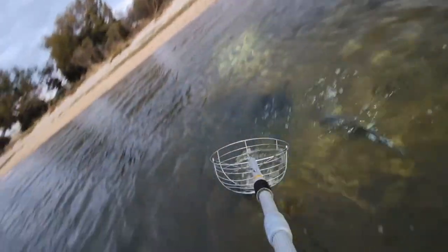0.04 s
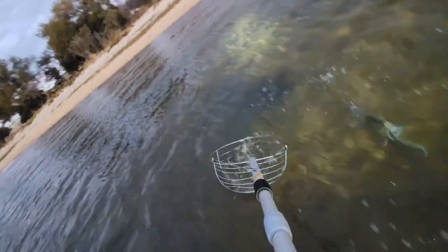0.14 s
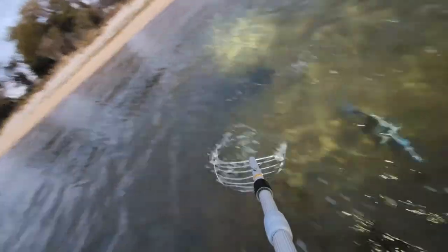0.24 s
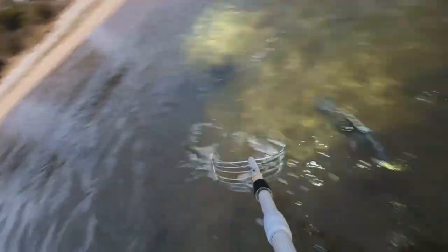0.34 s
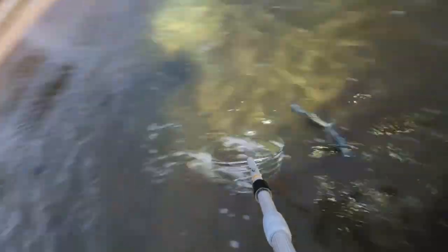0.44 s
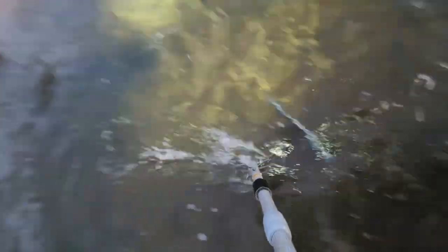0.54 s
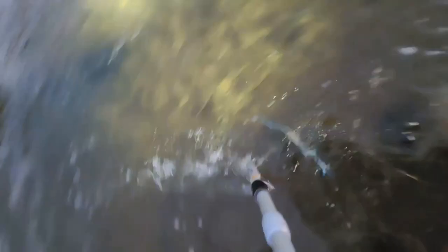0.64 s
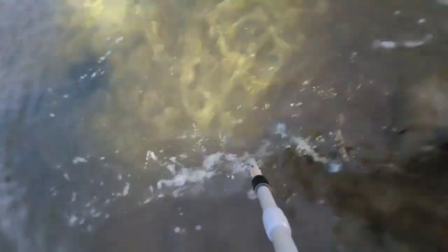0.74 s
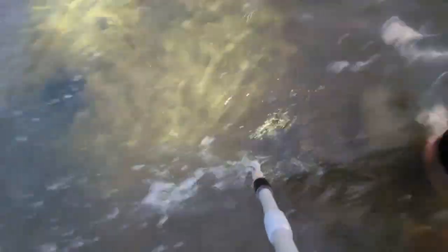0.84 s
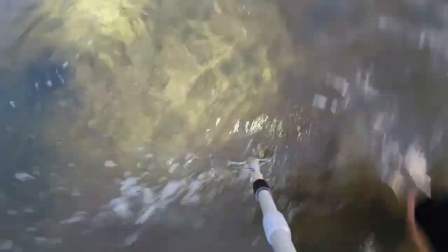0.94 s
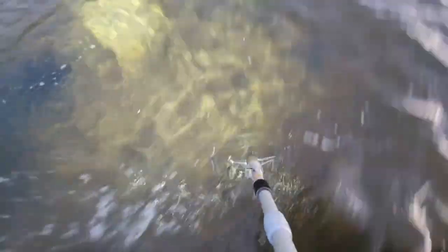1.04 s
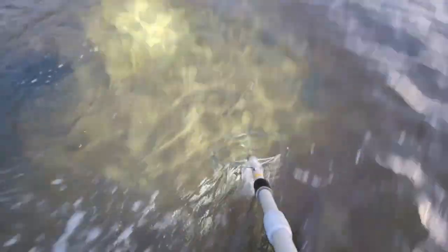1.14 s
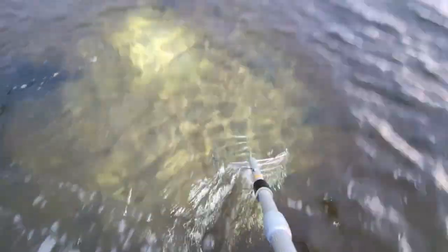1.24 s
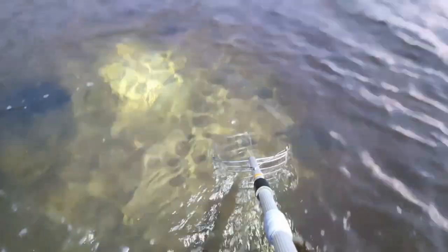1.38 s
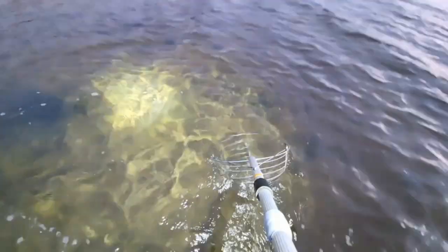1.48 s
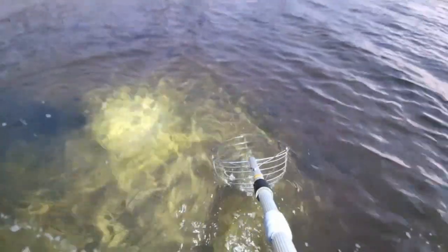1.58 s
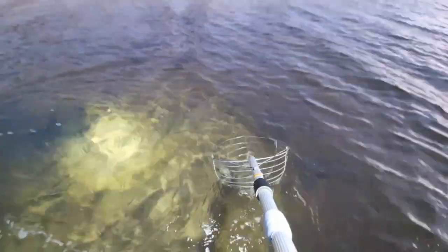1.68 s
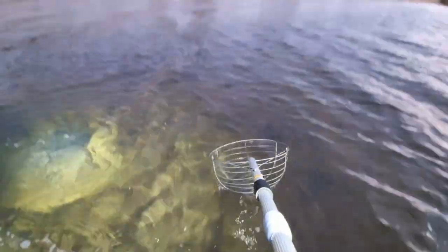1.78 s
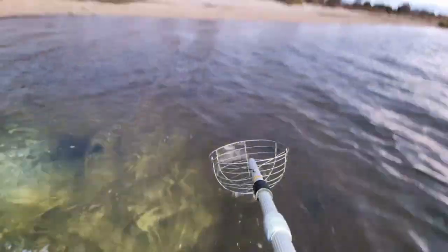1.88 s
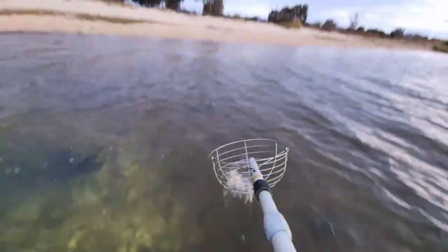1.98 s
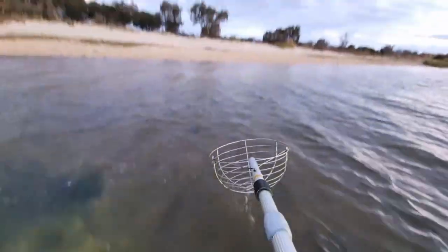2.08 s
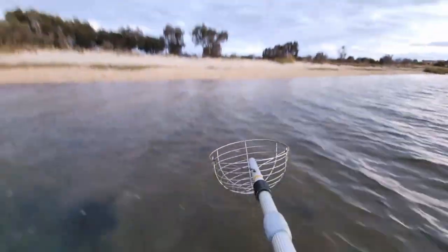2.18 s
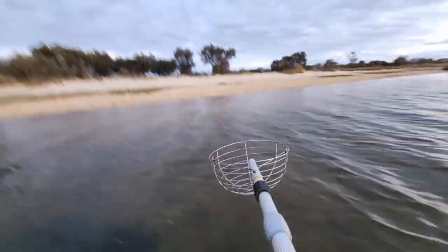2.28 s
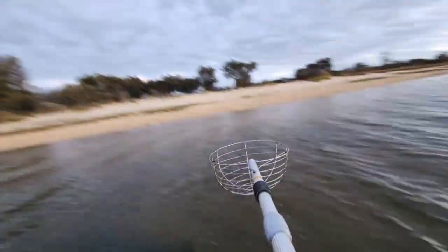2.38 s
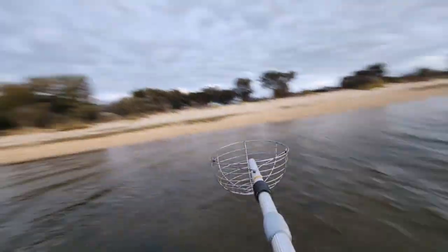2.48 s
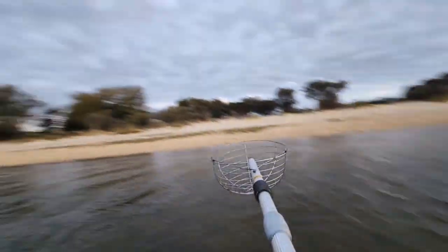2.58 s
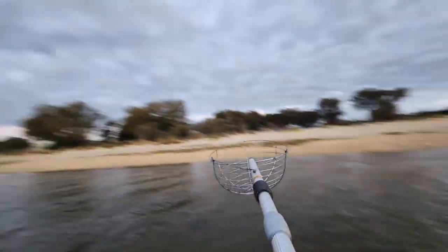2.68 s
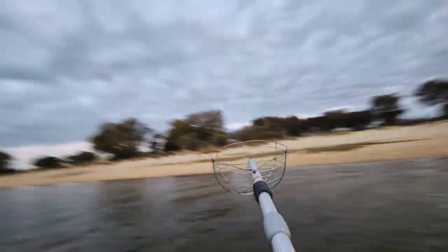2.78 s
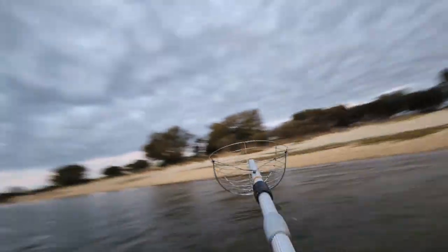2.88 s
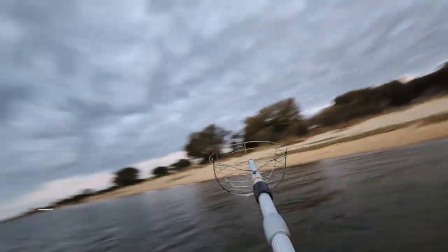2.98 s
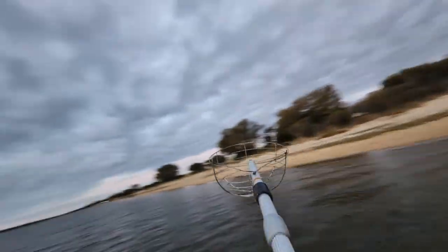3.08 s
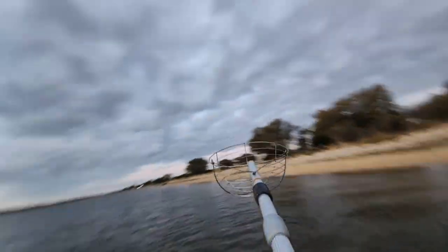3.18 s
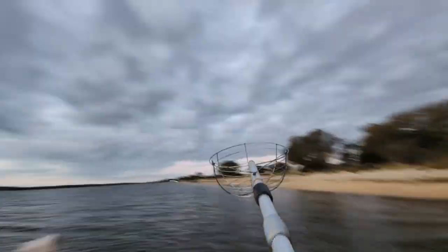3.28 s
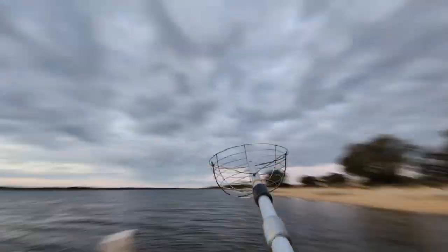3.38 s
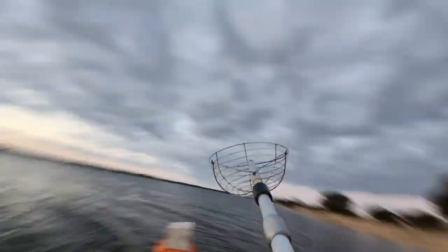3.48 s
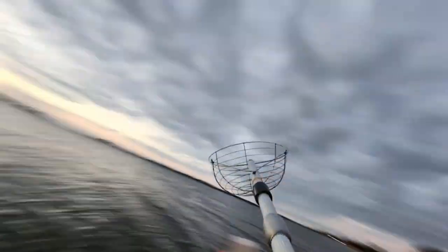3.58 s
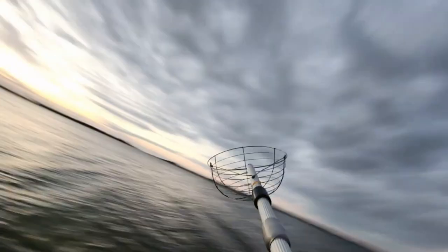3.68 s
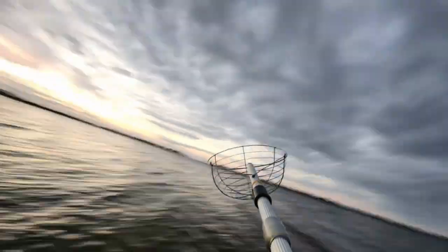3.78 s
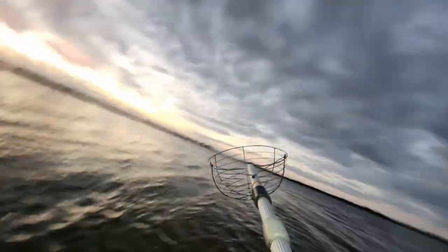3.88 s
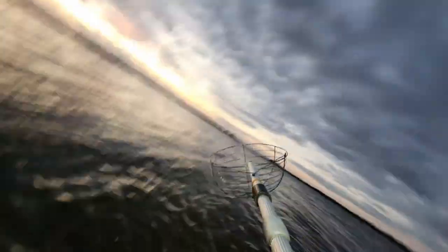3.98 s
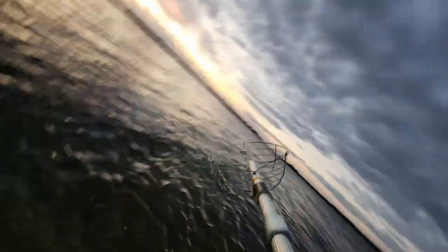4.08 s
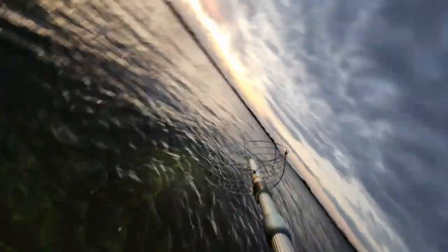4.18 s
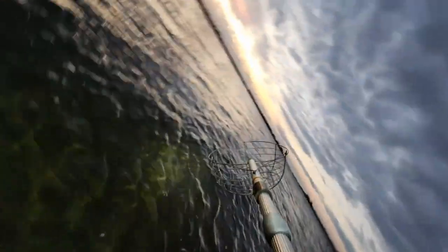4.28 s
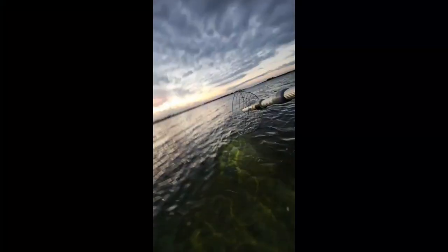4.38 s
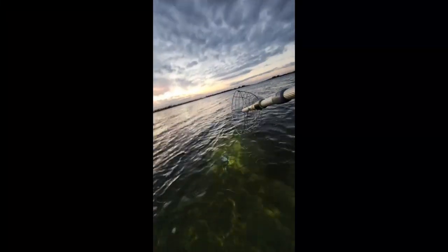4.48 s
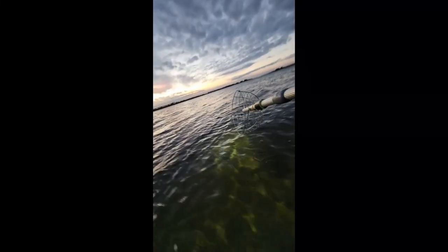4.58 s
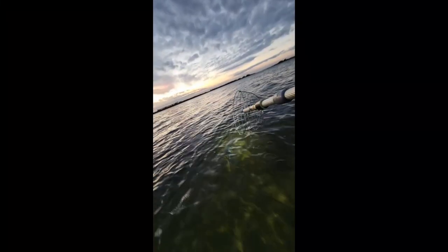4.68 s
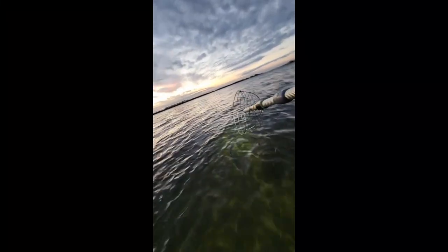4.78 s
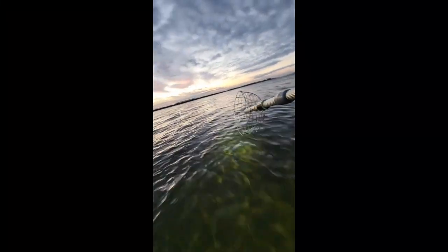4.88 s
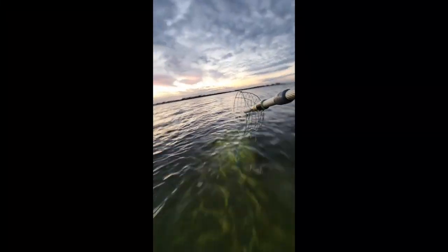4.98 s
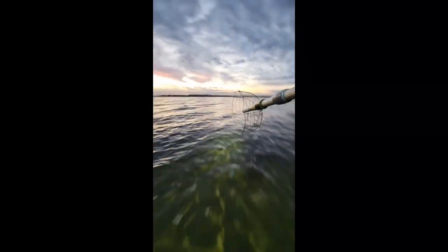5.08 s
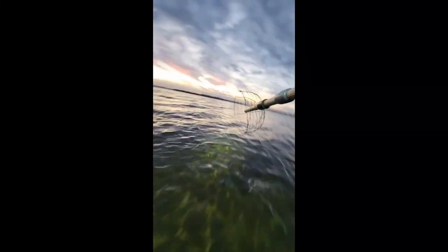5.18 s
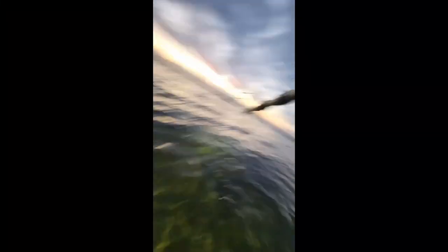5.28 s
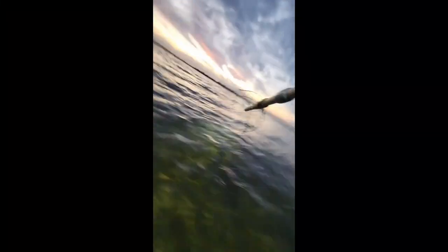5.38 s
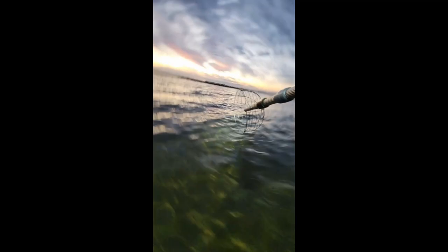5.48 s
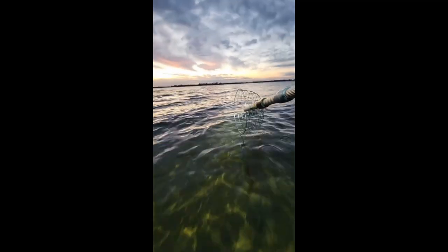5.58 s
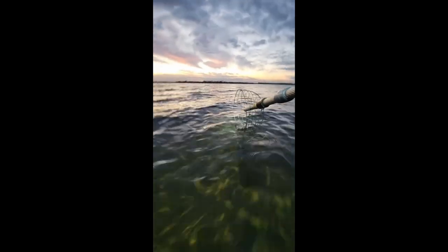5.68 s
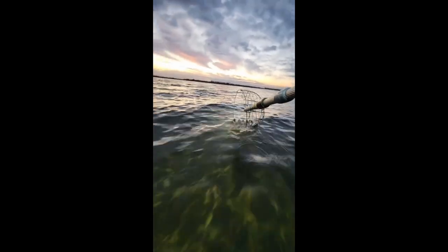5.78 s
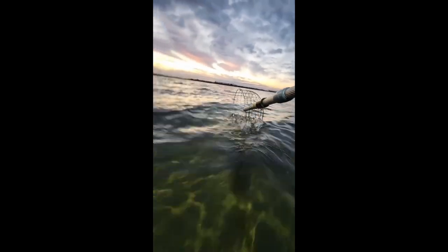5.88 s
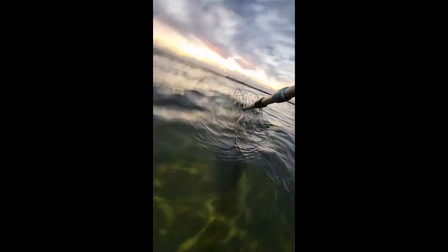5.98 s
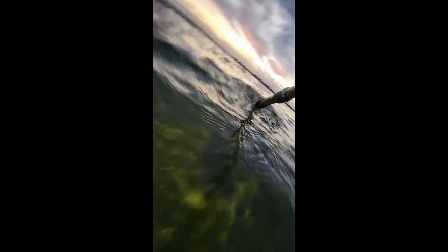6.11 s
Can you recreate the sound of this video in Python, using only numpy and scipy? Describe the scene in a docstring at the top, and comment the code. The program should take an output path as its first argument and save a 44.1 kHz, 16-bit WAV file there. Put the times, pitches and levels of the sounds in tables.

```python
"""Scoop net in windy shallows

A wire scoop net is jabbed about on a tidal flat: bubble clouds and foam noise slosh, splash and spray.
Damped sines plop and plink, gliding tones gulp, and one jerky scrape on sand rings the net's wires.
After a lull of drips the water churns steadily, a little to the left by its lead at the left port.
Wind, as lumpy low noise that differs between the two microphone ports, buffets throughout."""
import sys
import numpy as np
from scipy import signal
from scipy.fft import rfft, irfft, next_fast_len
from scipy.io import wavfile
from scipy.ndimage import uniform_filter1d, map_coordinates

SR = 44100
rng = np.random.default_rng(int(sys.argv[2]) if len(sys.argv) > 2 else 0)


def generate_wav(signal):
    """Clip the signal to [-1, 1] and save it as 16-bit WAV at the path in sys.argv[1]."""
    frames = np.transpose(np.atleast_2d(signal))
    scaled = np.clip(frames, -1, 1) * 32767
    pcm = np.round(scaled).astype(np.int16)
    wavfile.write(sys.argv[1], SR, pcm)


N = 270970


def amp(db):
    """Decibels to amplitude ratio."""
    return 10 ** (np.asarray(db) / 20)


def unit(x):
    """Normalisation to an rms of 1."""
    return x / np.sqrt(np.mean(x ** 2) + 1e-20)


def clock():
    """The time of every sample, in s."""
    return np.arange(N) / SR


def curves(rows):
    """Linear interpolation: one value per sample for each column after the time."""
    s, *columns = np.transpose(rows)
    return [np.interp(clock(), s, column) for column in columns]


def wobble(rate):
    """Band-limited fluctuation: a smooth random curve with rate knots a second."""
    knots = rng.standard_normal(int(N * rate / SR) + 4)
    return map_coordinates(knots, [clock() * rate])


def filtered(x, response):
    """Linear filtering: the spectrum of x times a response of frequency."""
    size = next_fast_len(N + SR // 2)
    spectrum = rfft(x, size) * response(np.fft.rfftfreq(size, 1 / SR))
    return irfft(spectrum, size)[..., :N]


def coloured(x, points):
    """Spectral shaping: x weighted by (Hz, dB) points on a log axis, at rms 1."""
    f, db = np.transpose(points)

    def response(hz):
        top_skirt = 1 / (1 + (hz / (2 * f[-1])) ** 2)
        low_skirt = hz ** 2 / (hz ** 2 + (f[0] / 2) ** 2)
        return top_skirt * low_skirt * amp(np.interp(np.log(hz + 1), np.log(f), db))

    return unit(filtered(x, response))


def noise(alike):
    """Partial coherence: white noise at both ports, of which a share of the power is common."""
    share = np.clip(alike, 0, 1)
    common = np.sqrt(share) * rng.standard_normal(N)
    return common + np.sqrt(1 - share) * rng.standard_normal((2, N))


def patchy(x, depth_db):
    """Spectro-temporal modulation: clumps of like pitch swell and fade in patches."""
    z = signal.stft(x, nperseg=512)[2]
    field = rng.standard_normal(z.shape[1:])
    field = uniform_filter1d(uniform_filter1d(field, size=7, axis=0), size=6, axis=1)
    return signal.istft(z * amp(depth_db * unit(field)), nperseg=512)[1][:, :N]


RISE_DB = 52.5  # how far a stroke swells over its rise time


def stroke(s, rise, hold, fall_db_per_s):
    """Exponential envelope: the gain of one movement swells up to time s, holds, then dies away."""
    t = clock() - s
    swell_db = RISE_DB * np.minimum(t, 0) / rise
    return amp(swell_db - fall_db_per_s * np.maximum(t - hold, 0))


# Wind strength: start_s [s], level_db [dB, before the lean to the left port]
WIND_BUFFETS = [(0, -52.5), (.3, -38.5), (.63, -33), (1.4, -34), (2.05, -37.5), (2.35, -50.5),
                (3.65, -47.5), (3.85, -35.5), (4.25, -36), (4.65, -55), (4.97, -36), (5.6, -35.5),
                (6.14, -41.5)]
# Eddies that hit the ports hard: middle_s [s], level_db [dB, before the lean], half_s [s, fall to 1/e]
WIND_THUMPS = [(0.612, -22, 0.019), (1.023, -32.5, 0.018), (4.068, -26, 0.015)]
# Colour of the buffeting: frequency_hz [Hz], density_db [relative dB per Hz]
RUMBLE_COLOUR = [(16, -36), (43, -2.5), (120, -6), (220, -12.5), (450, -22), (1200, -54)]
# Colour of the higher roar of gusts: frequency_hz [Hz], density_db [relative dB per Hz]
ROAR_COLOUR = [(150, -5), (280, -1.5), (400, -6), (600, -30.5), (1200, -28)]
ROAR_DB, ROAR_GROWS = 1, 3.57  # dB over the strongest buffet, and dB per dB of buffet


def wind():
    """Turbulent pressure: nearly incoherent eddies buffet and thump, harder on the left; gusts roar."""
    buffet_db, = curves(WIND_BUFFETS)
    lumps = amp(1.15 * wobble(13) + 8.2 * np.tanh([wobble(40), wobble(40)]))
    lean = amp(1.2 * np.array([[1], [-1]]))
    peak_db = buffet_db.max()
    roar_db = peak_db + ROAR_DB + ROAR_GROWS * (buffet_db - peak_db)
    roar = amp(roar_db) * unit(lumps * coloured(noise(0), ROAR_COLOUR))
    hits = sum(amp(db) * np.exp(-((clock() - s) / half) ** 2) for s, db, half in WIND_THUMPS)
    thumps = hits * coloured(noise(0.16), RUMBLE_COLOUR)
    buffet = amp(buffet_db) * unit(lumps * coloured(noise(0.075), RUMBLE_COLOUR))
    return (buffet + thumps) * lean + roar


# Flung drops: peak_s [s], level_db [dB]
FLUNG_DROPS = [(0.0952, -33), (.6025, -38), (1.2493, -37), (1.3134, -40.5), (1.991, -36.5), (2.534, -39),
               (2.773, -40), (3.834, -38.5), (3.942, -39), (4.385, -33.5), (4.904, -29), (5.1234, -30),
               (5.657, -31.5), (6.0816, -29.5)]
# Colour of spray and spatter: frequency_hz [Hz], density_db [relative dB per Hz]
SPRAY_COLOUR = [(2500, 2.5), (6000, -2.5), (9800, -6), (11700, -2.5), (15500, -5.5)]


def drops():
    """Impact noise: flung drops land with a bright, spiky spatter that peaks quickly and fades."""
    strength = np.zeros(N)
    for s, db in FLUNG_DROPS:
        before, after = (s - clock()) / 0.0044, (clock() - s) / 0.014
        strength += amp(db) * np.exp(-np.maximum(before, after))
    spatter = noise(0) * amp(6.5 * wobble(1200))
    return strength * coloured(spatter, SPRAY_COLOUR)


# The basket catches in the sand: start_s [s, full pressure], level_db [relative dB], hold_s [s]
SAND_CATCHES = [(0.84, -34, 0.098), (0.944, -21, 0.013), (.983, -17, 0.014), (1.021, -24, 0.017)]
CATCH_RISE_S, CATCH_FALL_DB_PER_S = .003, 480
# Modes of the basket's wires: pitch_hz [Hz], level_db [relative dB]
WIRE_MODES = [(1514, -4), (2859, -4), (2974, -4), (3237, -3), (3504, -4), (3658, -4), (3772, -4), (3931, 0),
              (4389, -6), (5535, -5)]
WIRE_T60 = .08  # s, decay by 60 dB
# Colour of the bright grating: frequency_hz [Hz], density_db [relative dB per Hz]
SAND_COLOUR = [(900, -11), (2000, -3), (3600, 2), (6000, 0), (6800, -8.5), (10000, -14.5)]
# Colour of the dull grinding: frequency_hz [Hz], density_db [relative dB per Hz]
GRIND_COLOUR = [(350, 10.5), (900, -1.5), (2200, -2.5), (3500, -19)]


def scrape():
    """Friction-driven resonance: sand grates in jerks and excites the wires, soon damped by the water."""
    catches = [amp(db) * stroke(s, CATCH_RISE_S, hold, CATCH_FALL_DB_PER_S) for s, db, hold in SAND_CATCHES]
    grit = np.max(catches, axis=0) * amp(2.6 * wobble(300))
    t = np.arange(SR // 3) / SR
    modes = sum(amp(db) * np.sin(2 * np.pi * hz * t + rng.normal(0, 0.52, (2, 1))) for hz, db in WIRE_MODES)
    wires = amp(-60 * t / WIRE_T60) * modes
    ringing = signal.fftconvolve(grit * noise(0.9), wires / np.linalg.norm(wires[0]), axes=1)[:, :N]
    bending = np.arange(N) + 4 * wobble(40)  # a wavering read position bends the pitch
    ringing = np.array([map_coordinates(port, [bending]) for port in ringing])
    # the root keeps the grinding present under light pressure
    grinding = np.sqrt(grit) * coloured(noise(0.21), GRIND_COLOUR)
    grating = grit * coloured(patchy(noise(0.23), depth_db=4), SAND_COLOUR)
    return amp(-18.0) * grinding + amp(-8.5) * grating + amp(-7.5) * ringing


BUBBLE_RISE = 0.026  # share by which a bubble's pitch climbs over its life


def ring(t, hz, life, rise):
    """Bubble resonance: a damped sine builds within a cycle and climbs in pitch as it nears the surface."""
    t = np.maximum(t, 0)
    tone = np.sin(2 * np.pi * hz * t * (1 + rise * t / life / 2))
    return tone * np.exp(-t / life) * (1 - np.exp(-2 * hz * t))


def single_bubbles(rows, cycles):
    """Transient and resonance: each bubble starts with a small wet snap and rings out over its cycles."""
    out = np.zeros((2, N))
    t = np.arange(SR // 10) / SR
    for s, hz, db in rows:
        snap = amp(-20) * np.exp(-t / 0.00079) * rng.standard_normal((2, len(t)))
        soft_snap = signal.lfilter([.5], [1, -.5], snap)
        tone = ring(t, hz, cycles / hz, BUBBLE_RISE)
        out[:, round(s * SR):][:, :len(t)] += amp(db) * (tone / np.abs(tone).max() + soft_snap)
    return out


# Open cavities that slap shut: start_s [s], pitch_hz [Hz], level_db [dB, peak of the tone]
PLOP_CAVITIES = [(.167, 800, -21.5), (.175, 2950, -15), (.346, 1130, -29), (.573, 686, -17),
                 (.5925, 2100, -26), (.613, 1020, -19), (.644, 585, -24.5), (.657, 340, -27.5),
                 (.711, 310, -19.5), (.862, 398, -20), (1.734, 1310, -18.5), (1.7663, 1020, -23),
                 (2.657, 720, -19), (2.6825, 810, -12.5), (3.359, 1350, -40), (5.025, 554, -18),
                 (5.379, 745, -17.5), (5.507, 570, -19.5)]


def plops():
    """Heavily damped resonance: open cavities slap shut at the surface and die within a few cycles."""
    return single_bubbles(PLOP_CAVITIES, cycles=1.8)


# Whole bubbles under the surface: start_s [s], pitch_hz [Hz], level_db [dB, peak of the tone]
PLINK_BUBBLES = [(.331, 2020, -34), (.5265, 2280, -30.5), (.5375, 1260, -29), (1.171, 3170, -31.5),
                 (1.531, 1640, -32), (1.547, 1180, -32), (1.608, 610, -27.5), (1.668, 543, -26),
                 (1.772, 3320, -30), (1.814, 369, -30), (1.898, 2100, -33), (2.535, 630, -30),
                 (3.465, 714, -42.5), (3.806, 2310, -23.5), (3.877, 3630, -30.5), (4.397, 2000, -28),
                 (5.483, 3030, -26)]


def plinks():
    """Lightly damped resonance: whole bubbles pinched off under the surface ring on."""
    return single_bubbles(PLINK_BUBBLES, cycles=7.5)


# Closing air pockets: middle_s [s], pitch_hz [Hz, mid-glide], level_db [dB, before flutter],
# half_s [s, fall to 1/e]
GULP_POCKETS = [(0.732, 304, -13.5, .0042), (1.164, 725, -33.5, 0.021), (1.298, 1054, -37.5, 0.0058),
                (2.28, 944, -49, .014), (2.943, 747, -31.5, 0.0179), (3.229, 880, -41.5, 0.0053),
                (4.238, 364, -28.5, .012), (4.686, 254, -26, 0.018), (4.762, 329.6, -23, 0.0302),
                (4.849, 383, -20, .015), (5.242, 315.6, -23, 0.021), (5.852, 270.6, -14, 0.023)]
GLIDE_OCTAVES = .28  # climb of a gulp over each half length


def gulps():
    """Cavity resonance: a closing air pocket swells, glides up unsteadily and fades."""
    out = np.zeros((2, N))
    t = np.arange(-SR // 20, SR // 20) / SR
    flutter_db, waver = 3 * wobble(350), 1.0 * wobble(420)  # waver is in radians of phase
    for s, hz, db, half in GULP_POCKETS:
        at = round((s + t[0]) * SR) + np.arange(len(t))
        gliding_hz = hz * 2 ** (GLIDE_OCTAVES * t / half)
        phase = 2 * np.pi * np.cumsum(gliding_hz) / SR + waver[at]
        out[:, at] += amp(db + flutter_db[at]) * np.exp(-(t / half) ** 2) * np.sin(phase)
    return out


# Collapsing wavelets: middle_s [s], pitch_hz [Hz, middle], level_db [dB],
# half_s [s, twice the standard deviation of bubble times]
WASH_WAVELETS = [(0.403, 1500, -45, 0.072), (0.856, 1380, -31, 0.014), (1.976, 1880, -42, 0.026),
                 (2.395, 386, -43, 0.031), (2.963, 575, -47.5, 0.049), (3.849, 2600, -43, .04),
                 (4.775, 2070, -46, 0.074), (4.893, 1900, -30, 0.028), (5.353, 1150, -31.5, 0.026),
                 (6.072, 1200, -32, 0.028)]
WASH_OCTAVES = 0.385  # standard deviation of bubble pitch
CRACKLE_CYCLES = 2.8  # life of a small crackling bubble


def washes(count):
    """Granular superposition: a wavelet collapses into a crackling swarm of like-sized bubbles."""
    out = np.zeros(N)
    steps = np.arange(SR // 25)
    for s, hz, db, half in WASH_WAVELETS:
        when, pitch, size = rng.standard_normal((count, 3)).T[..., None]
        own_hz = hz * 2 ** (WASH_OCTAVES * pitch)
        at = np.abs((s + half * when / 2) * SR).astype(int) + steps
        grains = size * ring(steps / SR, own_hz, CRACKLE_CYCLES / own_hz, BUBBLE_RISE)
        swarm = np.bincount(at.ravel(), grains.ravel(), N)[:N]
        out += amp(db) * swarm * np.sqrt(half * SR) / np.linalg.norm(swarm)
    return out


def bubbles(count, low_hz, high_hz, cycles, size_db, scatter):
    """Random superposition: a cloud of bubbles of chance pitch, size and bearing, its mean level evened."""
    when, pitch, luck, damping, bearing, side = rng.random((count, 6)).T[..., None]
    hz = low_hz * (high_hz / low_hz) ** pitch
    life = cycles * (.5 + damping) / hz
    size = amp(-size_db * np.log(luck + 0.0084)) * hz / low_hz  # many faint ones, few strong ones
    steps = np.arange(int(2 * np.pi * cycles / low_hz * SR))
    at = ((when * N).astype(int) + steps).ravel()
    lag = scatter * (2 * bearing - 1)  # s between the ports
    ports = []
    for sign in (-1, 1):
        t = steps / SR - np.maximum(sign * lag, 0)
        tones = size * (1 + sign * (side - .5)) * ring(t, hz, life, BUBBLE_RISE)
        ports.append(np.bincount(at, tones.ravel(), N)[:N])
    cloud = np.array(ports)
    power = np.abs(uniform_filter1d(np.mean(cloud ** 2, axis=0), size=2400))
    return cloud / np.sqrt(power + power.mean() / 20)


# Colour of large bubbles: frequency_hz [Hz], density_db [relative dB per Hz]
SLOSH_COLOUR = [(120, -47), (270, 2), (420, -0.5), (650, -6.5), (1100, -59)]


def water(levels, splash_colour, count, foam_db, size_db, spray_grain_db, alike, scatter):
    """Bubble acoustics: large, small and dripping bubbles with spray, over the noise of foam."""
    slosh_db, splash_db, spray_db = levels
    foam = lambda: amp(foam_db) * noise(alike)
    large = bubbles(count=1000, low_hz=163.4, high_hz=817.4, cycles=4.44, size_db=2.0, scatter=2 * scatter)
    small = bubbles(count=count, low_hz=482.3, high_hz=4980, cycles=CRACKLE_CYCLES,
                    size_db=size_db, scatter=scatter)
    drips = bubbles(count=130, low_hz=600, high_hz=2900, cycles=9, size_db=1, scatter=scatter)
    large, small = large + foam(), small + foam()
    lapping = 1.49 * wobble(30)  # dB, the swell of small waves
    splash = patchy(small * amp(lapping) + amp(-6) * drips, depth_db=2.5)
    mist = noise(0.24) * amp(spray_grain_db * wobble(600) + 1.83 * wobble(120) + lapping)
    return (amp(slosh_db + lapping) * coloured(large, SLOSH_COLOUR)
            + amp(splash_db) * coloured(splash, splash_colour)
            + amp(spray_db) * coloured(mist, SPRAY_COLOUR))


# Jabs of the net: start_s [s, full strength], rise_s [s], hold_s [s], splash_db [dB, small bubbles],
# slosh_db [dB, large bubbles], spray_db [dB]; levels are before lapping
NET_JABS = [(0.108, 0.091, 0.069, -33.5, -37, -41.5), (0.563, 0.46, 0.045, -37.5, -39, -44.5),
            (0.843, 0.008, 0.34, -54.5, -37.5, -48.5), (1.249, 0.064, 0.11, -45.5, -44, -53.5),
            (1.659, 0.29, 0.11, -36.5, -37.5, -47.5), (1.978, 0.2, 0.0082, -44.5, -37, -50),
            (2.645, 0.26, 0.024, -35.5, -45.5, -43), (2.755, 0.069, 0.074, -42, -52.5, -54)]
SPLASH_FALL_DB_PER_S, SLOSH_FALL_DB_PER_S, SPRAY_FALL_DB_PER_S = 186, 152, 195
# Rocking of the stirred water: start_s [s], slosh_db [dB, before lapping]
ROCKING = [(0, -71.5), (.3, -47), (.7, -45), (1.15, -52.5), (1.5, -69.5), (1.95, -46), (2.2, -58)]
RIPPLE_DB, RIPPLE_SPRAY_DB, RIPPLE_GROWS = -56.5, -56.5, 0.62  # dB at the mean swell; dB per dB of swell


def jabbing():
    """Power addition: every jab adds its burst to the slosh, splash and spray of the rocking water."""
    swell_db, = curves(ROCKING)
    ripple_db = RIPPLE_GROWS * (swell_db - swell_db.mean())
    power = amp([swell_db, RIPPLE_DB + ripple_db, RIPPLE_SPRAY_DB + ripple_db]) ** 2
    for s, rise, hold, splash_db, slosh_db, spray_db in NET_JABS:
        power += np.square([amp(slosh_db) * stroke(s, rise, hold, SLOSH_FALL_DB_PER_S),
                            amp(splash_db) * stroke(s, rise, hold, SPLASH_FALL_DB_PER_S),
                            amp(spray_db) * stroke(s, rise, hold, SPRAY_FALL_DB_PER_S)])
    return 10 * np.log10(power)


# Strength of the churning flow: start_s [s], level_db [dB, reference for the three layers]
FLOW_STRENGTH = [(3.76, -51.5), (3.83, -45), (4.1, -47), (4.29, -45.5), (4.39, -39.5), (4.76, -32.5),
                 (5.0, -37.5), (5.2, -35.5), (5.37, -31.5), (5.45, -38.5), (5.85, -31.5), (6.14, -35.5)]


def churning():
    """Common modulation: slosh, splash and spray levels all follow the strength of the flow."""
    flow_db, = curves(FLOW_STRENGTH)
    return flow_db - 0.5, flow_db + 2.5, flow_db - 3


# Colour of the loose splashing: frequency_hz [Hz], density_db [relative dB per Hz]
SPLASH_COLOUR = [(350, -16), (650, 1.5), (1300, -3.5), (2400, -9.5), (4500, -14.5), (7000, -16),
                 (11000, -64)]
# Colour of the dense churning: frequency_hz [Hz], density_db [relative dB per Hz]
CHURN_COLOUR = [(400, 3.5), (620, 1), (1200, -7.5), (2250, -9), (4200, -19), (8000, -27)]
# The jabbing gives way to churning: start and end of the crossfade [s]
TURN_TIMES = [3.6, 3.673]


def stirring():
    """Equal-power crossfade: loose sloshing with sparse bubbles gives way to denser, steady churning."""
    loose = water(jabbing(), SPLASH_COLOUR, count=4000, foam_db=-7, size_db=0.5,
                  spray_grain_db=2.5, alike=0.74, scatter=0.00006)
    dense = water(churning(), CHURN_COLOUR, count=7000, foam_db=0, size_db=0.5,
                  spray_grain_db=2.0, alike=0.87, scatter=0.00005)
    turn = np.interp(clock(), TURN_TIMES, [0, np.pi / 2])
    return np.cos(turn) * loose + np.sin(turn) * dense


# Shifting bearing of the water: start_s [s], lead_s [s, left port ahead of right]
WATER_BEARING = [(0, -.00006), (.6, .00008), (1.15, .00004), (1.25, -.00019), (2.1, .00003), (2.4, -.00014),
                 (3.15, -.00014), (3.85, .00034), (4.85, .00045), (5.38, .00021), (5.72, .0004),
                 (6.14, .00012)]


def placed(pair):
    """Interaural-style time difference: the water reaches the nearer port first, by a shifting lead."""
    shift = curves(WATER_BEARING)[0] * SR / 2
    return np.array([map_coordinates(port, [np.arange(N) + sign * shift], order=5)
                     for port, sign in zip(pair, (1, -1))])


def scene():
    """Superposition: the water, heard from its bearing, with the drops, the scrape and the wind."""
    bursts = plops() + plinks() + gulps() + washes(count=70)
    return wind() + drops() + scrape() + placed(stirring() + bursts)


TOP_HZ = 15900  # upper band limit


def record(dry):
    """Ideal low-pass filtering: nothing passes at or above the band limit."""
    return filtered(dry, lambda hz: hz < TOP_HZ)


dry = scene()
out = record(dry)
generate_wav(out)
```